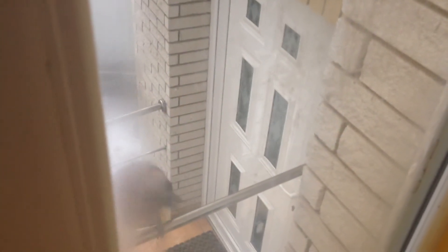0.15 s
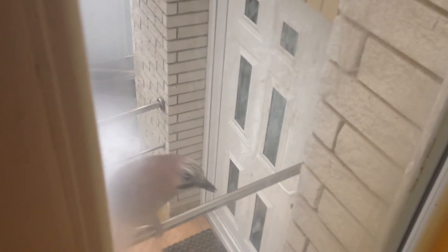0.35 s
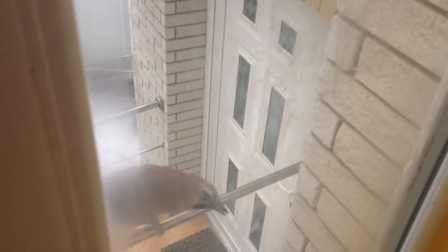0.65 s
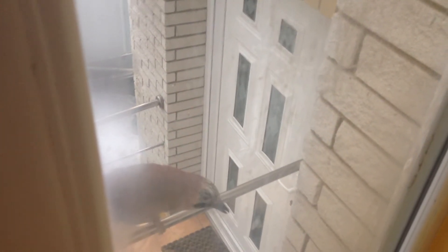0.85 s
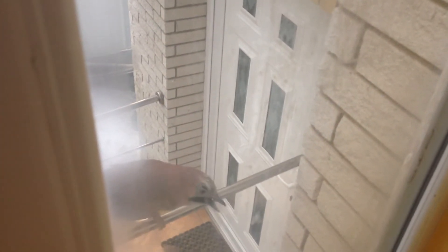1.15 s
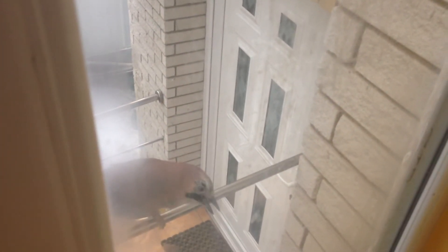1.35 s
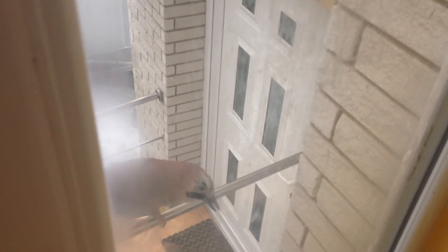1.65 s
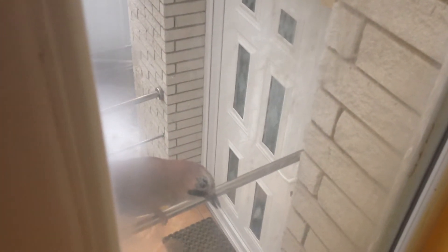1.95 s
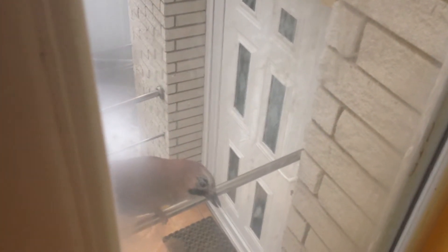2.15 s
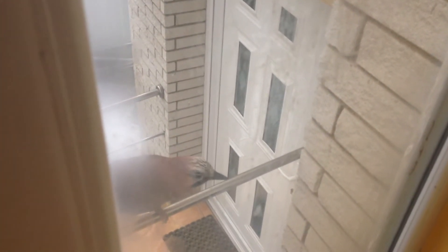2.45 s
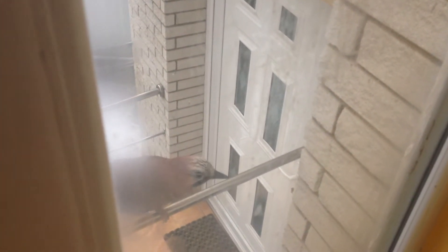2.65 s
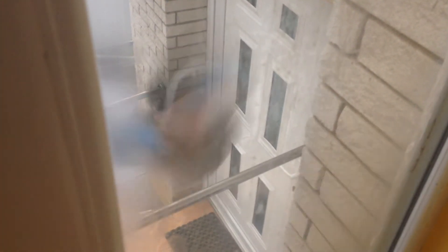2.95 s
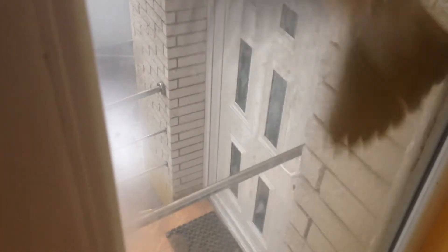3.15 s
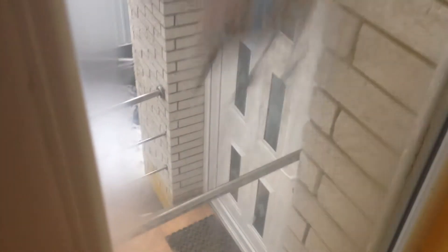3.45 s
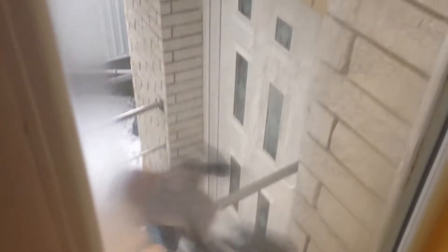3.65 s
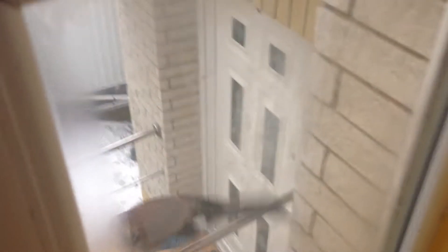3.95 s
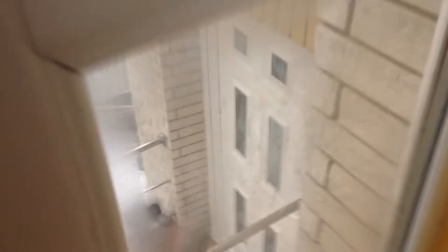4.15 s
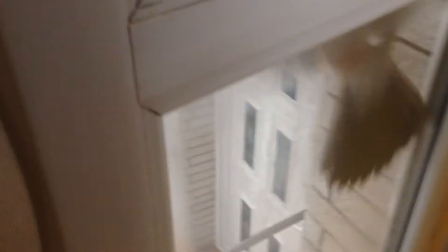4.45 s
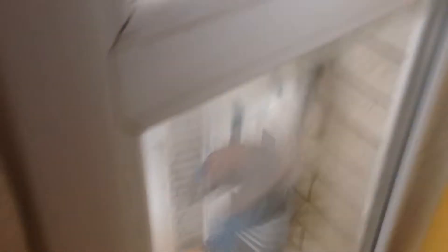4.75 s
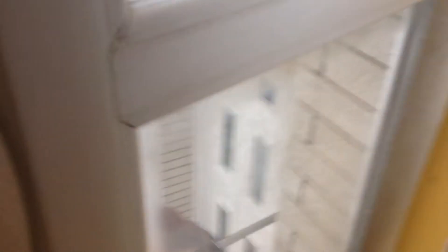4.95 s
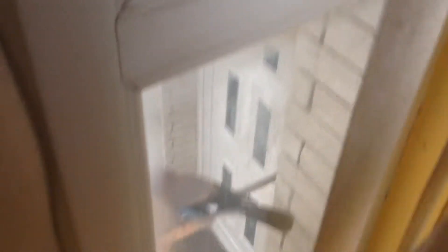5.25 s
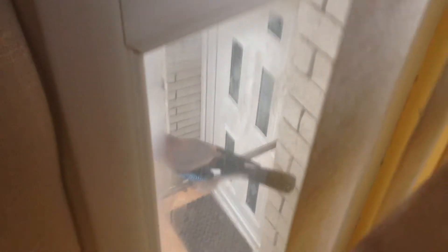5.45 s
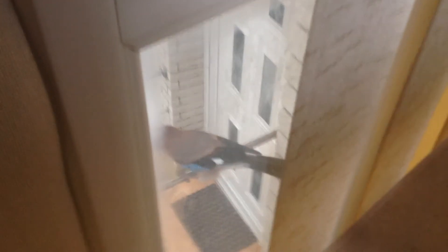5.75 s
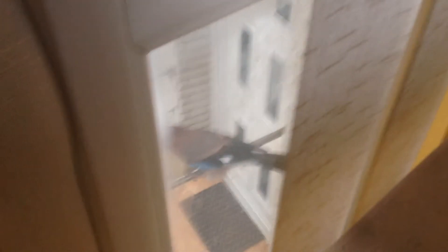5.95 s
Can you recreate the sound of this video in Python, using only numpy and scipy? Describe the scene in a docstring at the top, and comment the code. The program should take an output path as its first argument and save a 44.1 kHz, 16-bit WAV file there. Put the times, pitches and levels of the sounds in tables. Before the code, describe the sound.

A bird hits a window pane twice with sharp, booming knocks and brief claw scratches, heard indoors over a faint hum.

```python
"""A jay at a window, heard from inside a quiet room where an appliance hums.
It gives a few faint squeaks and pips, then flies up twice and strikes the glass with its beak.
The pane's modes boom and ring under beak and body; claws and feathers scratch over it in tiny slips.
The room answers with a diffuse tail."""
import sys
import numpy as np
from scipy import signal
from scipy.fft import rfft, irfft
from scipy.io import wavfile
from scipy.ndimage import uniform_filter1d

SR = 44100
rng = np.random.default_rng(int(sys.argv[2]) if len(sys.argv) > 2 else 0)


def unload_wav(signal):
    """Save mono or channel-first audio to the path in sys.argv[1] as 16-bit WAV at rate SR, clipped to [-1, 1]."""
    wavfile.write(
        sys.argv[1],
        SR,
        np.round(np.clip(np.atleast_2d(signal).T, -1, 1) * 32767).astype(np.int16),
    )


N = 268833

# appliance hum (frequency [Hz], rms level [dB])
HUM_TONES = [(100, -76), (120.2, -78), (200.1, -51), (240.4, -87), (398.5, -79.5), (449.3, -85),
             (549.2, -86.5), (649.4, -87)]
# room air and hiss (frequency [Hz], relative density [dB])
AIR_SPECTRUM = [(25, -13), (42, -6), (60, 2), (80, 1), (120, -1), (180, 10), (260, 1.5), (420, -6.5),
                (650, -12), (1000, -17.5), (2000, -18.5), (4000, -17.5), (7000, -19), (15000, -20)]
# falling squeaks (time [s], length [s], level [dB], start pitch [Hz])
SQUEAKS = [(0.061, .022, -65, 1300), (1.48, 0.0088, -61, 1194)]
# squeak overtones (multiple of pitch, level [dB])
SQUEAK_OVERTONES = [(2, -6.5), (3, -1.5), (4, -13)]
# pips (peak time [s], pitch [Hz], level [dB], swell [s])
PIPS = [(1.2308, 2820, -41.5, 0.0027), (1.2805, 2845, -46, 0.0024), (1.3575, 2810, -43.5, 0.0014)]
# claw or beak tip catching on glass or sill (time [s], level [dB], centre [Hz])
SCRATCHES = [(2.646, -63.5, 4000), (3.113, -40.5, 3760), (3.2553, -36, 2430), (3.2774, -46, 4530),
             (3.31, -44.5, 4660), (3.353, -51, 3300), (4.3743, -43, 3880), (4.442, -46.5, 4550),
             (4.4854, -39, 3100), (4.507, -54, 4350), (4.616, -52.5, 3220), (4.837, -64, 6970),
             (4.898, -62.5, 5720), (5.143, -64.5, 1560), (5.253, -64, 3100), (5.352, -63, 1940),
             (5.578, -67.5, 2900)]
# wings and body against the pane (time [s], level [dB], low-pass [Hz])
BUMPS = [(3.1195, -4, 171), (3.25, -16, 253), (3.311, -22, 250), (4.382, -8, 227), (4.483, -24.5, 400),
         (4.976, -18, 98.6)]
# pane modes (frequency [Hz], t60 [s], level struck at spot 0 [dB], level struck at spot 1 [dB])
PANE_MODES = [(92, 0.45, -47, -42), (130.4, .2, -41.5, -35.5), (159.2, 0.15, -15, -18.5),
              (190.7, .32, -16, -28), (246.6, 0.37, -13, -22), (270.8, 0.52, -25.5, -30.5),
              (356.9, 0.3, -19, -22.5), (421.7, 0.067, -28, -23.5), (462, 0.54, -40, -36),
              (527.4, 0.14, -29, -26.5), (587.5, 0.19, -22, -22.5), (642, 0.14, -23.5, -31),
              (663, 0.073, -28, -20), (722, 0.1, -25.5, -31), (751, 0.25, -32.5, -30.5),
              (841, .15, -28.5, -42), (889, 0.23, -35, -26.5), (927, 0.21, -31, -41.5),
              (936, 0.13, -33, -29), (1028, 0.16, -33, -24), (1089, .19, -39, -34),
              (1187, 0.14, -30.5, -40.5), (1236, 0.2, -32.5, -31), (1340, 0.18, -33, -33.5),
              (1432, 0.13, -28.5, -43), (1515, .1, -28.5, -39), (1595, 0.088, -33.5, -36.5),
              (1657, .15, -33.5, -41), (1802, .13, -38, -42.5), (2060, 0.14, -50, -38)]
# beak on glass (time [s], spot, ring [dB], shimmer [dB], crack [dB], crack low-pass [Hz],
# rebound delay [s], rebound re crack [dB])
KNOCKS = [(3.126, 0, -1, -26.5, -12.5, 7360, .0036, 2), (4.4005, 1, -1, -26.5, -19, 4860, .0028, 7.5)]
# dense upper modes of pane and frame (frequency [Hz], relative density [dB], t60 [s])
SHIMMER_BANDS = [(120, -16, 0.95), (600, -4.5, 0.2), (1370, -8.5, 0.19), (2120, -12, 0.11),
                 (4000, -19.5, .05), (6470, -27.5, 0.049), (8600, -39.5, .04), (15430, -40, .04)]
# contact crack (frequency [Hz], relative density [dB])
CRACK_SPECTRUM = [(150, -7.5), (450, -3), (900, 1), (1500, -14.5), (2400, 11), (3400, 10), (5000, 4.5),
                  (7000, -10.5), (15000, -14.5)]
# feathers on glass and sill (time [s], length [s], level [dB], centre [Hz])
RUSTLES = [(3.634, 0.044, -71.5, 1467), (4.381, 0.044, -45, 2600), (4.464, 0.05, -47, 1340),
           (4.531, .11, -67.5, 3570), (5.332, 0.17, -72.5, 1720)]
# room tail (frequency [Hz], level [dB], t60 [s])
ROOM_BANDS = [(70, -6, 0.78), (200, -18.5, 0.75), (512, -22.5, 0.66), (950, -20, 0.64), (1600, -23, 0.89),
              (3500, -12, 0.23), (7130, -11.5, 0.27), (14000, -15, 0.28)]


def from_db(db):
    """Decibels to gain."""
    return 10 ** (np.asarray(db) / 20)


def unit_rms(x):
    """Scale to unit power."""
    return x / np.sqrt(np.mean(x ** 2) + 1e-20)


def at_hz(table, hz, column=1):
    """Interpolate a table column over log frequency."""
    table = np.array(table)
    return np.interp(np.log(np.maximum(hz, 1)), np.log(table[:, 0]), table[:, column])


def add(out, time_s, sound):
    """Mix a sound in from time_s."""
    start = int(round(time_s * SR))
    out[start:start + len(sound)] += sound[:N - start]


def butter(x, order, hz, kind="low"):
    """Butterworth filter."""
    return signal.sosfilt(signal.butter(order, hz, kind, fs=SR, output="sos"), x)


def noise(spectrum_db, size):
    """Unit-power noise shaped by spectrum_db(hz)."""
    gain = from_db(spectrum_db(np.fft.rfftfreq(size, 1 / SR)))
    return unit_rms(irfft(rfft(rng.standard_normal(size)) * gain, size))


def drift(rate_hz):
    """Slow random wander, unit rms."""
    return noise(lambda hz: -20 * np.log10(1 + (hz / rate_hz) ** 2), N)


def decaying_noise(bands):
    """1 s of noise in third octaves, each with its own level and t60."""
    t, hz = np.arange(SR) / SR, np.fft.rfftfreq(SR, 1 / SR)
    white, out = rfft(rng.standard_normal(SR)), 0
    edges_hz = np.geomspace(45, 16000, 27)
    for low_hz, high_hz in zip(edges_hz, edges_hz[1:]):
        centre_hz = np.sqrt(low_hz * high_hz)
        band = irfft(white * (hz >= low_hz) * (hz < high_hz), SR)
        t60_s = at_hz(bands, centre_hz, column=2)
        out += band * from_db(at_hz(bands, centre_hz)) * 1000 ** (-t / t60_s)
    return out


def appliance_hum(waver_db=-0.14, waver_hz=4, wander_rad=0.032, wander_hz=0.86):
    """Steady tones, wavering slightly in phase and level."""
    out, t = np.zeros(N), np.arange(N) / SR
    for hz, db in HUM_TONES:
        out += from_db(db) * np.sqrt(2) * np.sin(2 * np.pi * hz * t + wander_rad * drift(wander_hz))
    return out * from_db(waver_db * drift(waver_hz))


def room_air(rms_db=-61.5):
    """Steady low rush and faint hiss."""
    return from_db(rms_db) * noise(lambda hz: at_hz(AIR_SPECTRUM, hz), N)


def stroke(length_s, centre_hz, half_width_oct, attack_s=0.00022, release_s=0.0021, grain_db=-0.5):
    """One slide of tiny slips, ringing in the band of the claw or quill."""
    t = np.arange(SR // 3) / SR
    width = 2 ** half_width_oct - 2 ** -half_width_oct
    rub = noise(lambda hz: -10 * np.log10(1 + ((hz / centre_hz - centre_hz / (hz + 1)) / width) ** 4),
                len(t))
    grain = unit_rms(uniform_filter1d(rng.standard_normal(len(t)), size=40))
    slips = unit_rms(from_db(grain_db * grain))
    ease_s = 0.089 * length_s   # long strokes start and end more gently
    attack = 1 - np.exp(-t / (attack_s + ease_s))
    release = np.exp(-np.maximum(t - length_s, 0) / (release_s + ease_s))
    return rub * slips * attack * release


def squeaks(fall_oct_per_s=19, attack_s=0.00067, release_s=0.0053, rasp_db=-5):
    """Three overtones slide down together over a little rasp."""
    out, t = np.zeros(N), np.arange(SR // 3) / SR
    for time_s, length_s, db, pitch_hz in SQUEAKS:
        phase = 2 * np.pi * np.cumsum(pitch_hz * 2 ** (-fall_oct_per_s * t)) / SR
        tone = sum(from_db(tone_db) * np.sin(multiple * phase) for multiple, tone_db in SQUEAK_OVERTONES)
        envelope = (1 - np.exp(-t / attack_s)) * np.exp(-np.maximum(t - length_s, 0) / release_s)
        rasp = from_db(rasp_db) * stroke(length_s, centre_hz=3200, half_width_oct=0.74)
        add(out, time_s, from_db(db) * (tone * envelope + rasp))
    return out


def pips(fade_s=0.0013, upper_hz=4300, upper_db=-21, rasp_db=-11, rasp_s=0.0034, rasp_oct=0.33,
         echo_db=-8, echo_s=0.0086):
    """Tiny two-tone pips swell to a raspy peak and stop; the porch walls scatter each one."""
    out, t = np.zeros(N), np.arange(-SR // 20, SR // 20) / SR
    for peak_s, pitch_hz, db, swell_s in PIPS:
        tone = np.sin(2 * np.pi * pitch_hz * t) + from_db(upper_db) * np.sin(2 * np.pi * upper_hz * t)
        envelope = np.exp(np.minimum(t / swell_s, -t / fade_s))
        rasp = noise(lambda hz: -10 * (np.log2((hz + 1) / pitch_hz) / rasp_oct) ** 2, len(t))
        rasp *= from_db(rasp_db) * np.exp(-np.abs(t) / rasp_s)
        note = from_db(db) * (tone * envelope + rasp)
        walls = rng.standard_normal(len(t)) * (t > 2 * fade_s) * np.exp(-np.abs(t) / echo_s)
        echo = unit_rms(signal.fftconvolve(note, walls, "same")) * np.std(note)
        add(out, peak_s + t[0], note + from_db(echo_db) * echo)
    return out


def scratches(catch_s=0.006, bite_db=-46.5, light_oct=0.25, hard_oct=0.61, drag_s=0.016, drag_db=-9):
    """A brief catch, narrow-band if light and broad if it bites, then a softer, lower drag."""
    out = np.zeros(N)
    for time_s, db, centre_hz in SCRATCHES:
        bite = 0.5 + 0.5 * np.tanh((db - bite_db) / 2)
        catch = stroke(catch_s, centre_hz, half_width_oct=light_oct + bite * (hard_oct - light_oct))
        drag = stroke(drag_s, 0.7 * centre_hz, half_width_oct=0.66)
        add(out, time_s, from_db(db) * catch)
        add(out, time_s + catch_s, from_db(db + drag_db) * drag)
    return out


def pane_ring(spot, attack_s=0.0011, early_boost_db=5, friction_s=0.032, radiation_hz=90):
    """A blow pushes all modes the same way, each by its share at that spot; the deepest radiate poorly."""
    t, modes = np.arange(SR) / SR, 0
    for hz, t60_s, *spot_db in PANE_MODES:
        modes -= from_db(spot_db[spot]) * np.sin(2 * np.pi * hz * t) * 1000 ** (-t / t60_s)
    attack = 1 - np.exp(-t / attack_s)
    # the first wide swings rub in the frame and die faster than the later ring
    early_swing = from_db(early_boost_db * np.exp(-(t / friction_s) ** 2))
    return butter(modes * attack * early_swing, 2, radiation_hz, "high")


def body_bumps():
    """Soft contact wakes only the pane's low modes."""
    out = np.zeros(N)
    for time_s, db, lowpass_hz in BUMPS:
        add(out, time_s, from_db(db) * butter(pane_ring(spot=1), 2, lowpass_hz))
    return out


def beak_knocks(attack_s=0.00071, crack_s=0.0013, sizzle_db=-23):
    """The beak cracks on the glass, rebounds once and leaves the pane ringing."""
    out, t = np.zeros(N), np.arange(SR) / SR
    attack = 1 - np.exp(-t / attack_s)
    for time_s, spot, ring_db, shimmer_db, crack_db, lowpass_hz, rebound_s, rebound_db in KNOCKS:
        shimmer = decaying_noise(SHIMMER_BANDS)
        shimmer /= np.std(shimmer[:SR // 50])   # unit rms over the first 20 ms
        add(out, time_s, from_db(ring_db) * pane_ring(spot) + from_db(shimmer_db) * shimmer * attack)
        for delay_s, db in ((0, crack_db), (rebound_s, crack_db + rebound_db)):
            crack = noise(lambda hz: at_hz(CRACK_SPECTRUM, hz), SR)
            crack *= from_db(db) * attack * np.exp(-t / crack_s)
            # contact time limits the treble; only a little sizzle lies above
            add(out, time_s + delay_s, butter(crack, 10, lowpass_hz) + from_db(sizzle_db) * crack)
    return out


def feather_rustles():
    """Feathers make longer, duller strokes as the bird flaps at the pane and settles."""
    out = np.zeros(N)
    for time_s, length_s, db, centre_hz in RUSTLES:
        add(out, time_s, from_db(db) * stroke(length_s, centre_hz, half_width_oct=0.52))
    return out


def room_reverb(x, tail_gain_db=-31, build_s=0.012):
    """Diffuse echoes build up after the direct sound and die band by band."""
    t = np.arange(SR) / SR
    tail = decaying_noise(ROOM_BANDS) * (1 - np.exp(-(t / build_s) ** 2))
    return from_db(tail_gain_db) * signal.fftconvolve(x, tail)[:N]


def scene(low_cut_hz=72):
    """The bird at the window sounds into the humming room; mono."""
    window = beak_knocks() + body_bumps() + scratches() + feather_rustles() + pips() + squeaks()
    window = butter(window, 4, low_cut_hz, "high")   # the small pane carries no deep bass
    return (window + room_reverb(window) + appliance_hum() + room_air())[None]


def record(dry, cutoff_hz=15400):
    """Steep elliptic low-pass."""
    return signal.sosfilt(signal.ellip(12, 0.1, 80, cutoff_hz, fs=SR, output="sos"), dry)


dry = scene()
out = record(dry)
unload_wav(out)
```